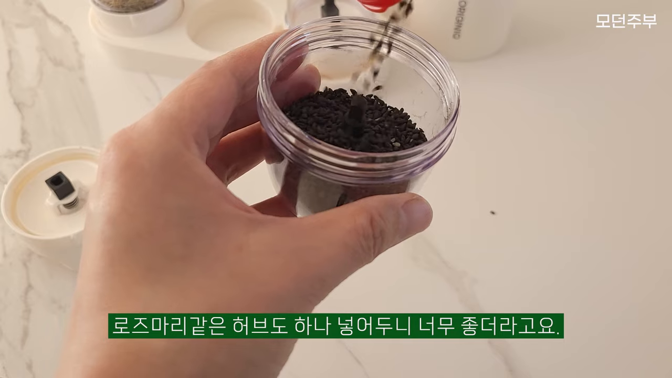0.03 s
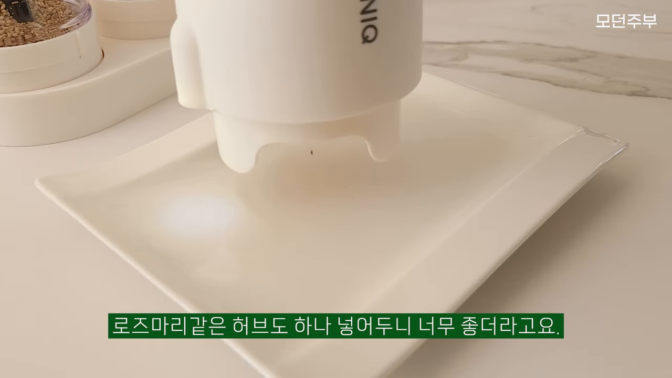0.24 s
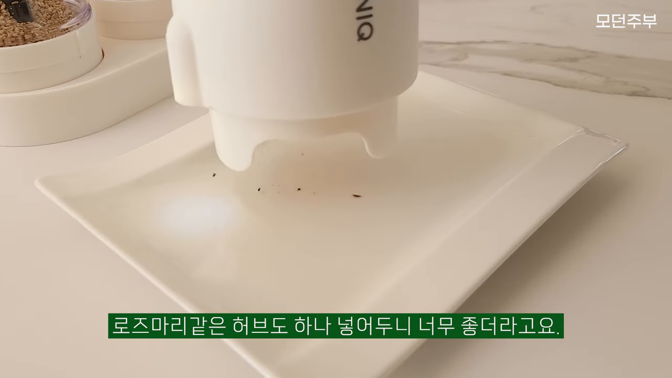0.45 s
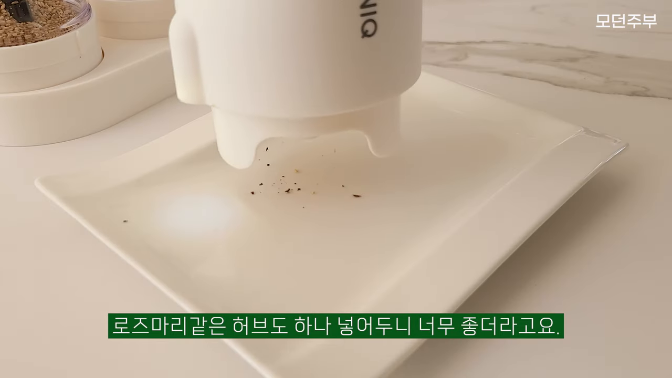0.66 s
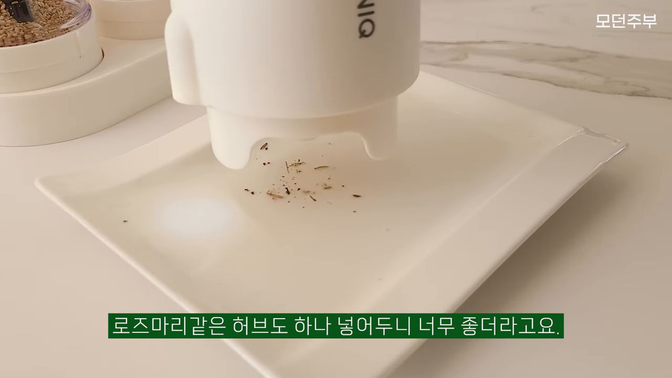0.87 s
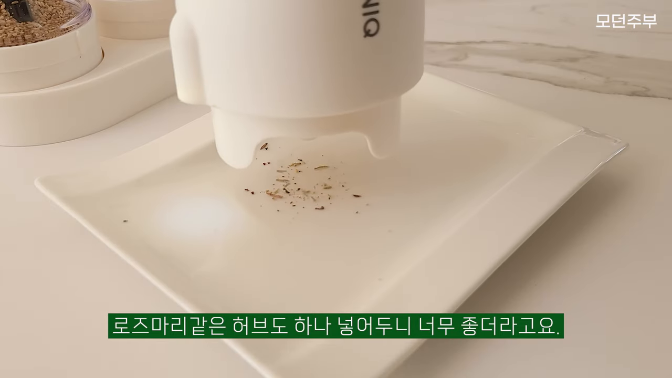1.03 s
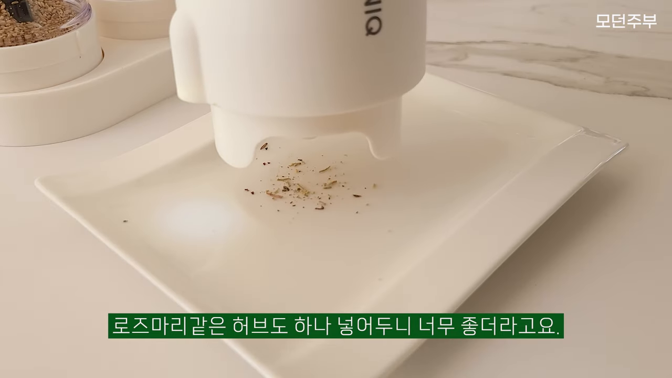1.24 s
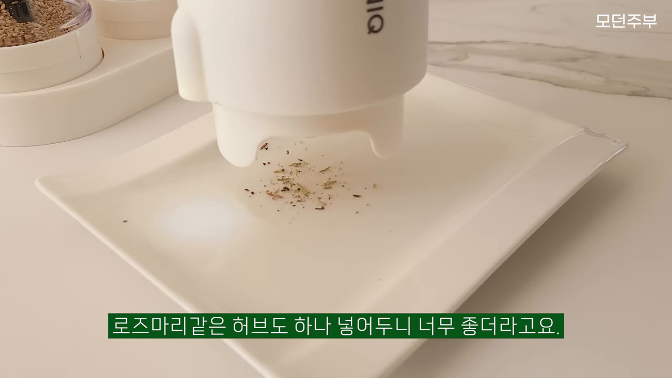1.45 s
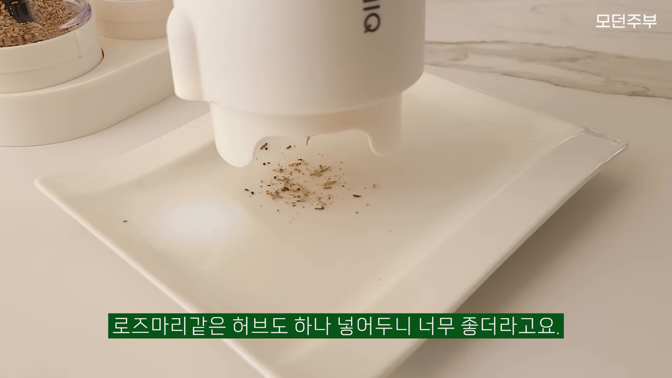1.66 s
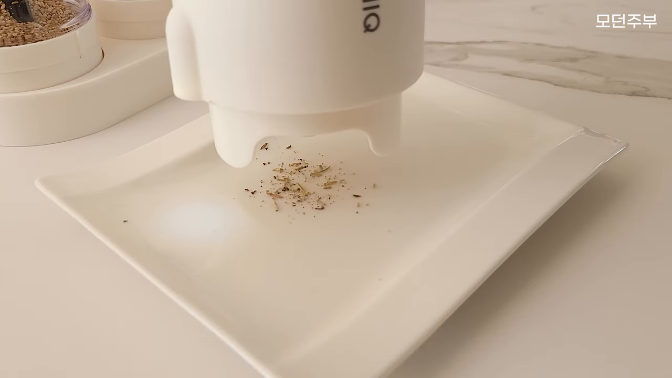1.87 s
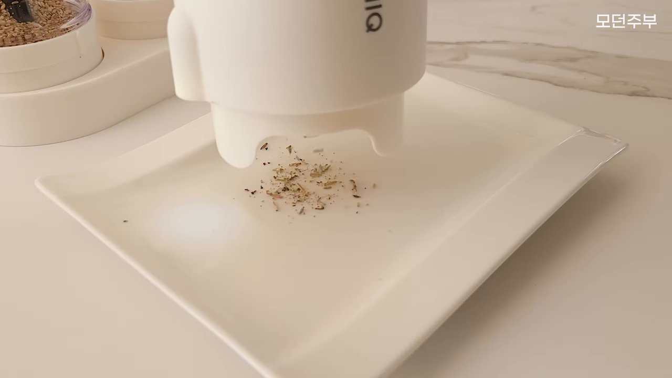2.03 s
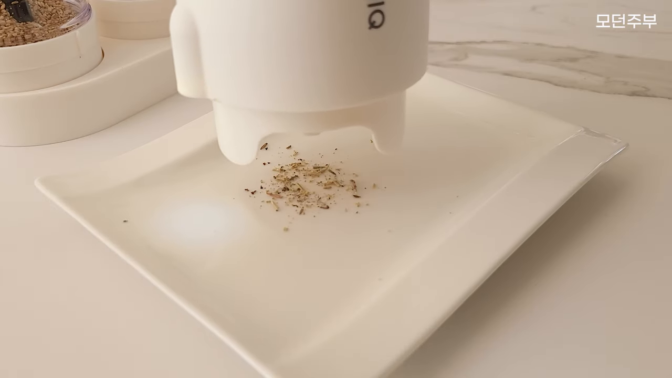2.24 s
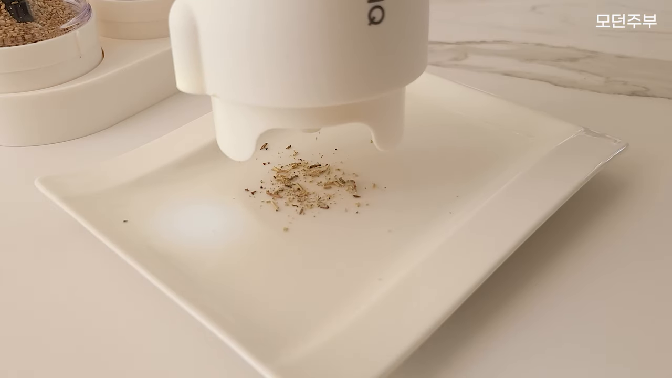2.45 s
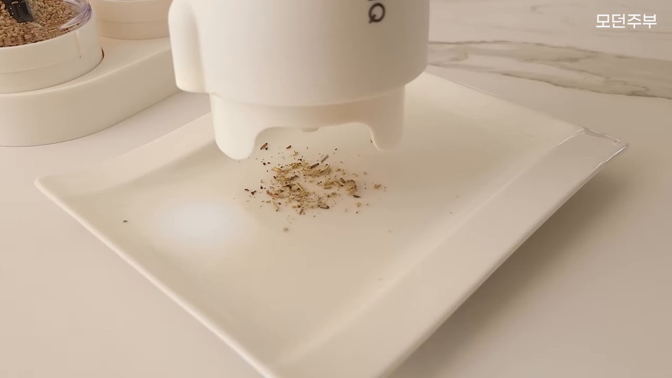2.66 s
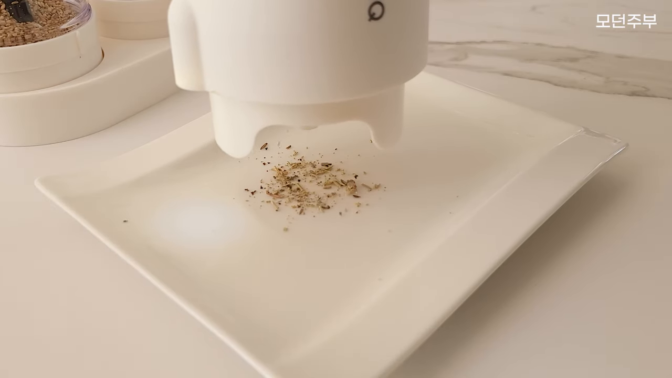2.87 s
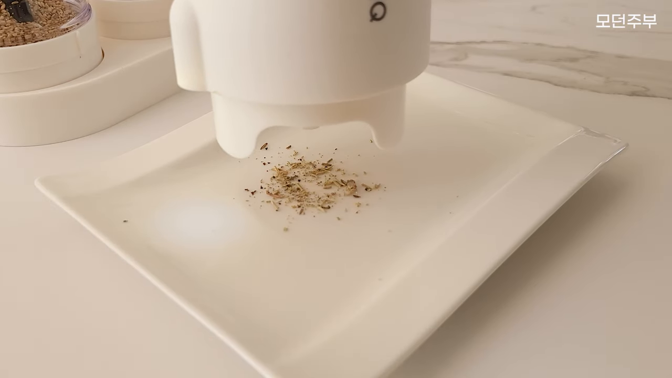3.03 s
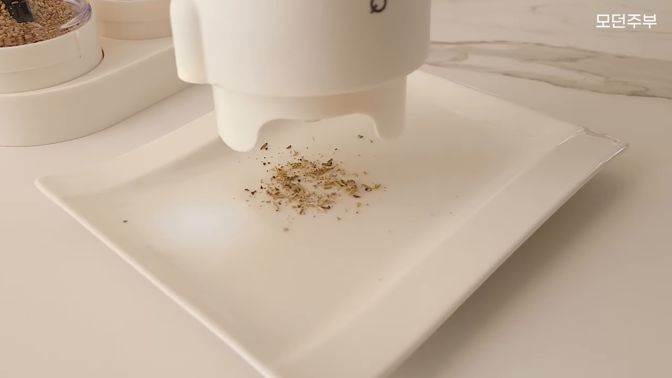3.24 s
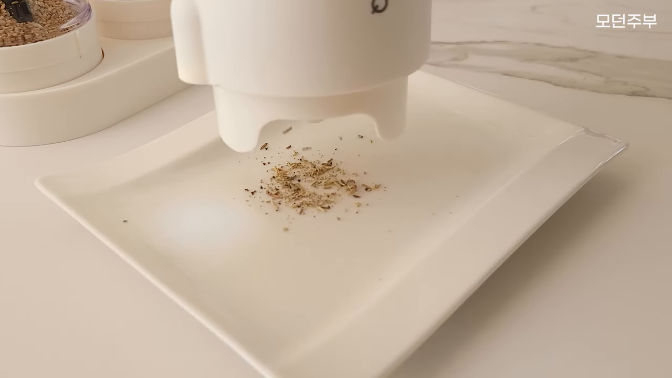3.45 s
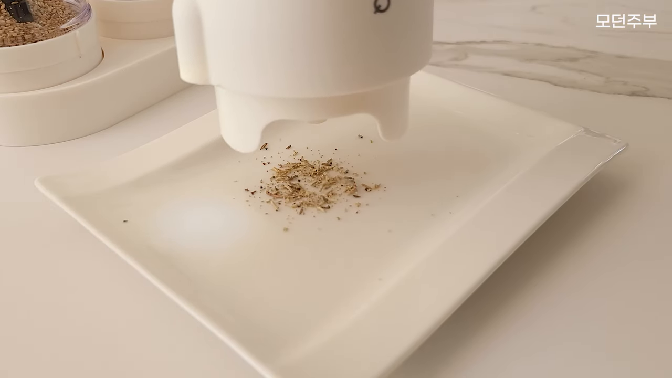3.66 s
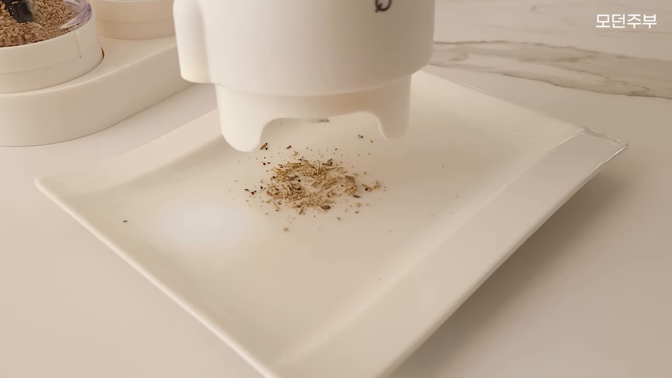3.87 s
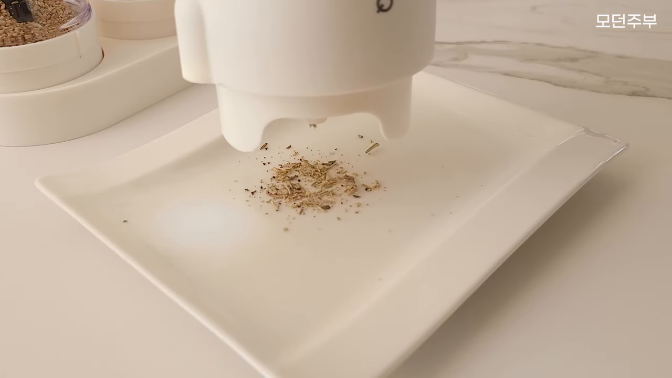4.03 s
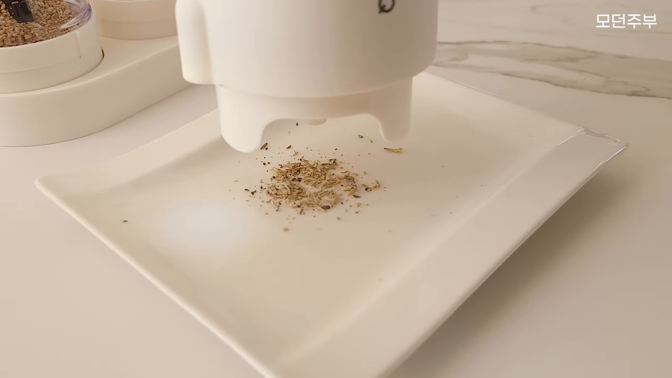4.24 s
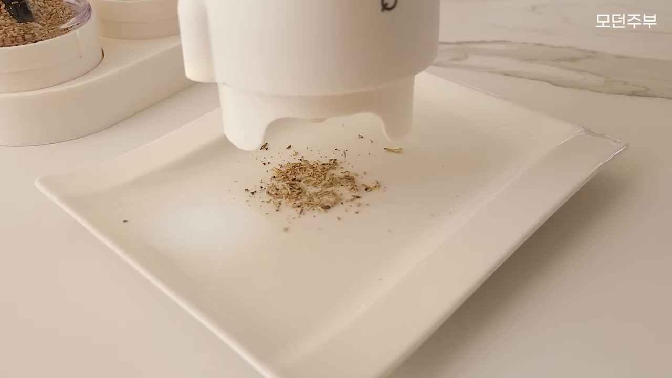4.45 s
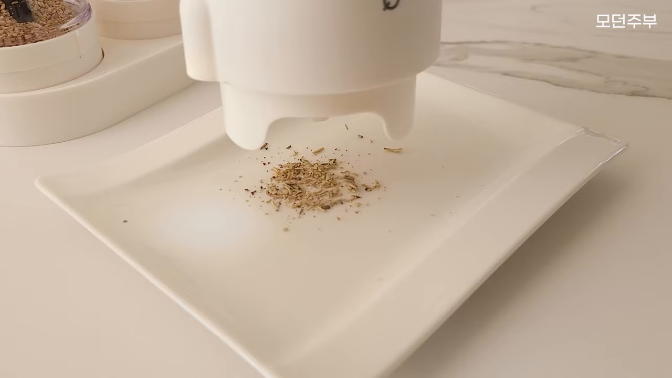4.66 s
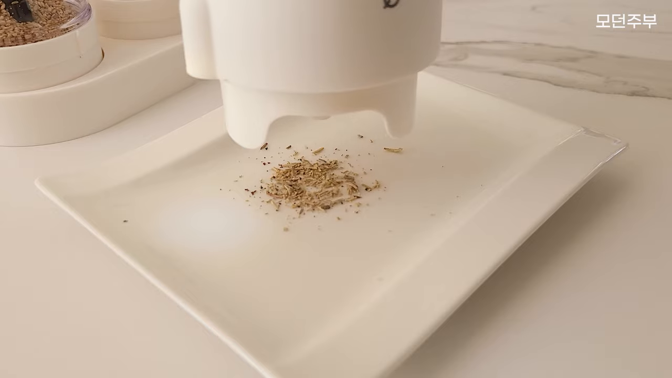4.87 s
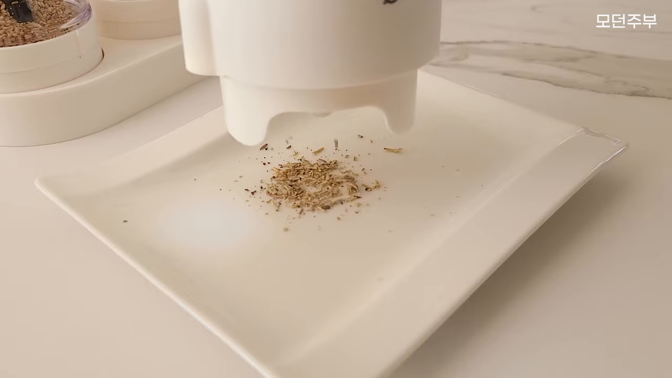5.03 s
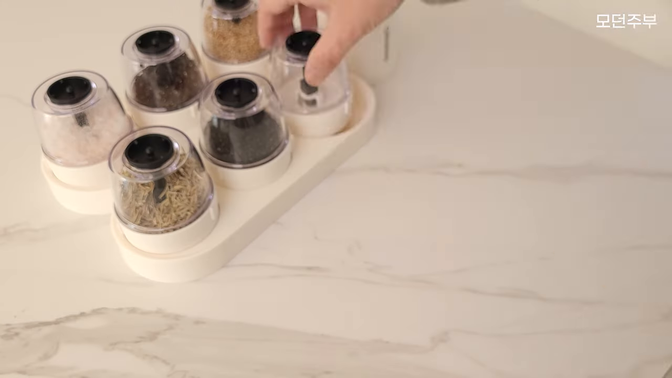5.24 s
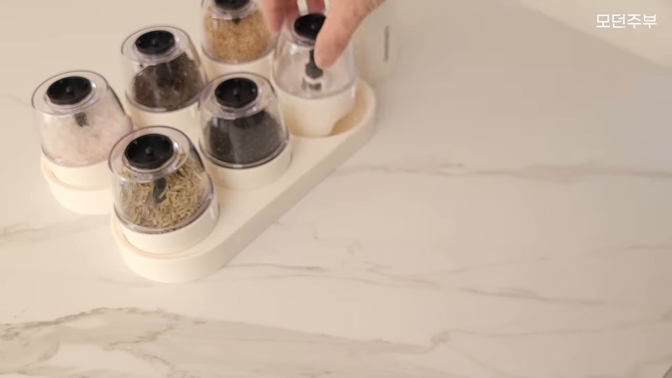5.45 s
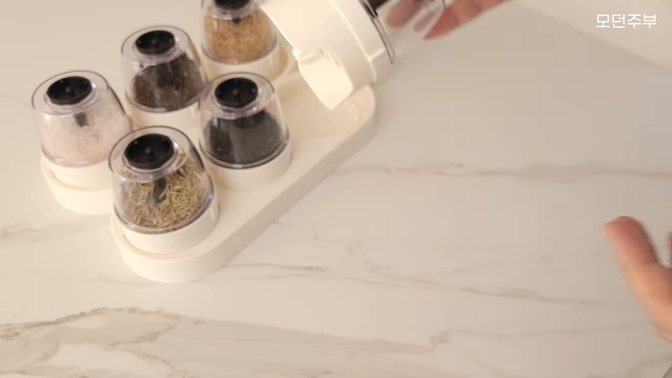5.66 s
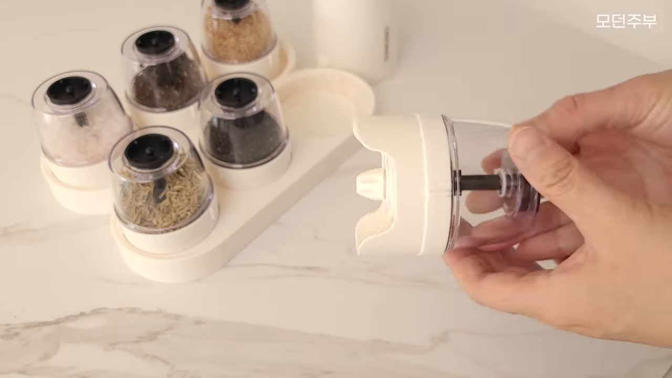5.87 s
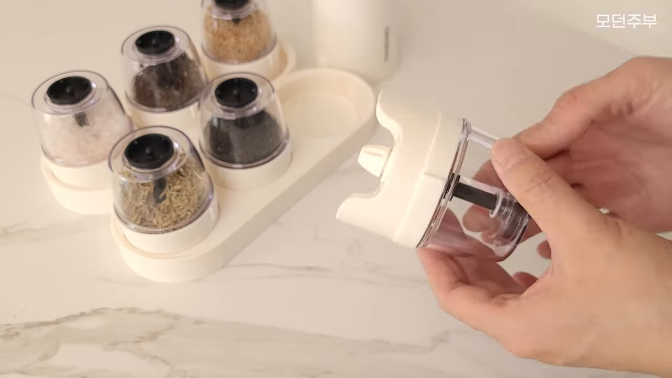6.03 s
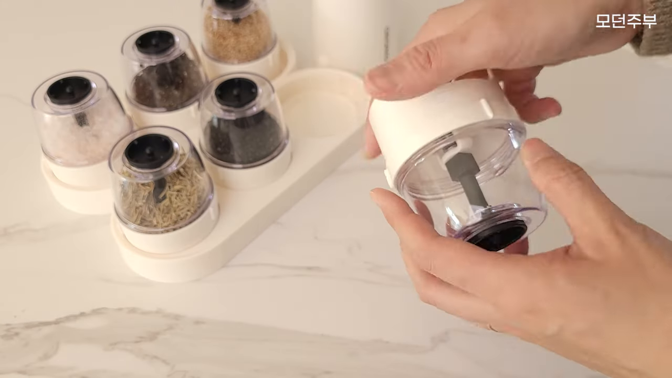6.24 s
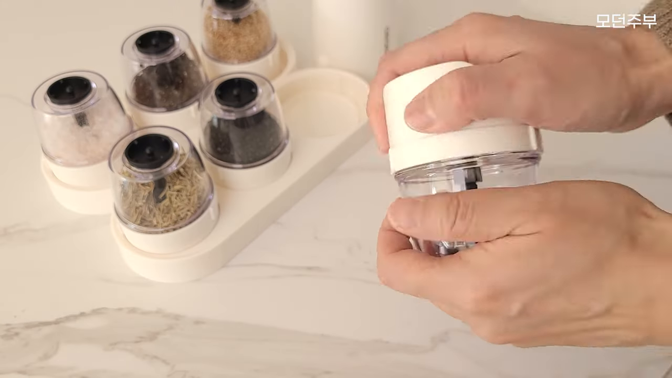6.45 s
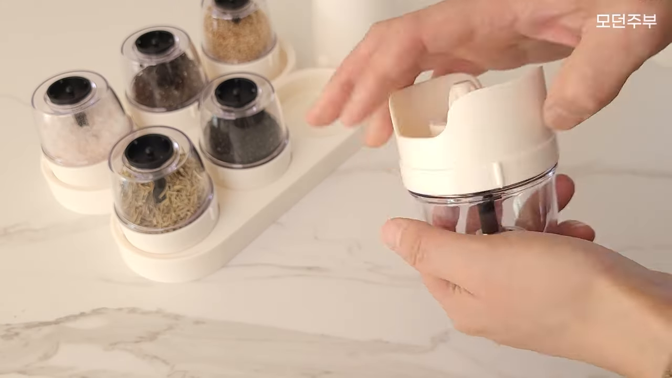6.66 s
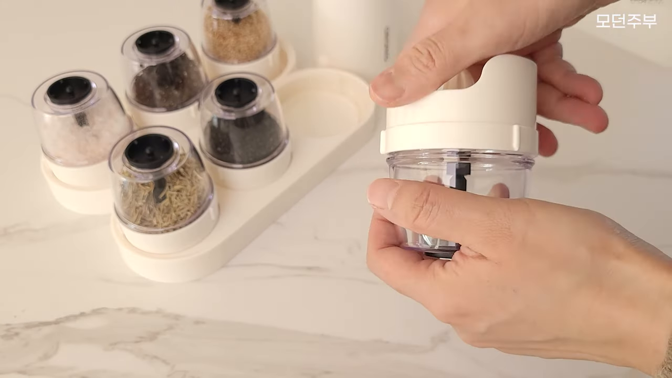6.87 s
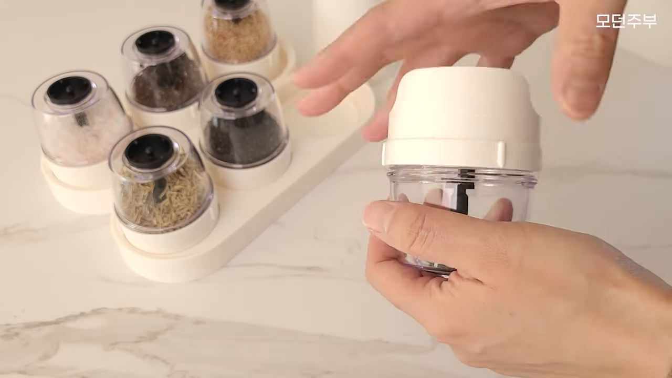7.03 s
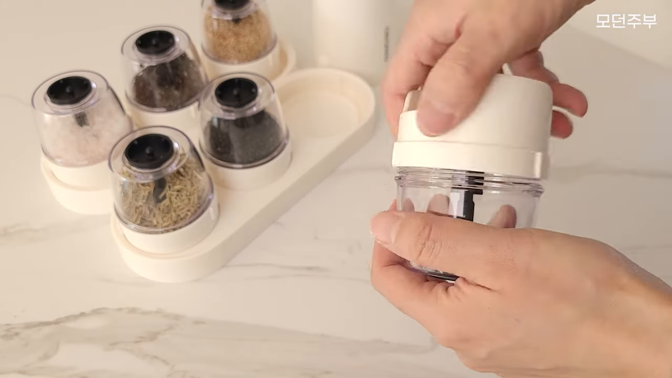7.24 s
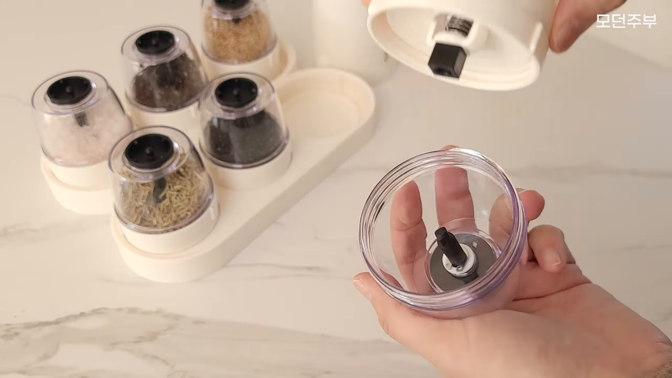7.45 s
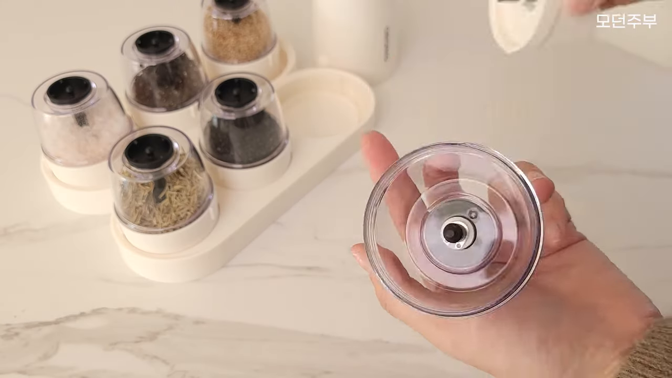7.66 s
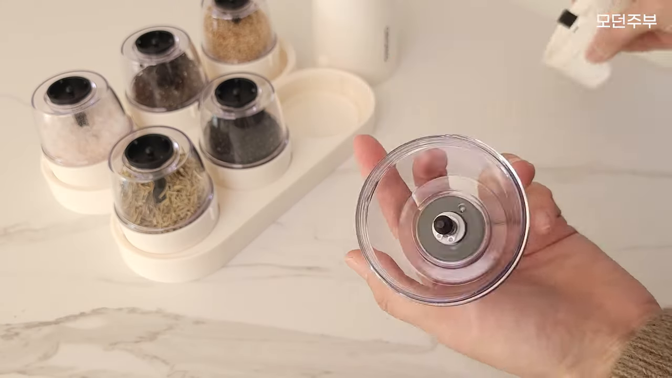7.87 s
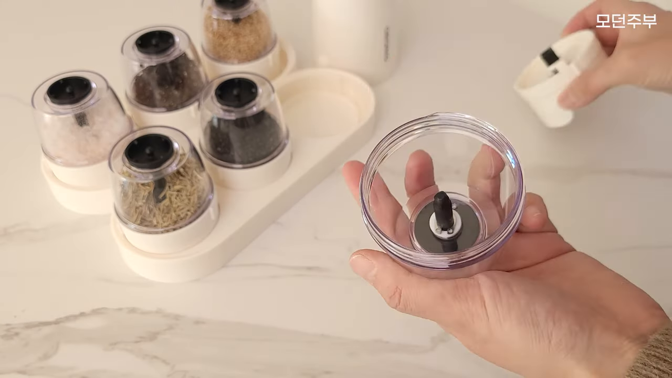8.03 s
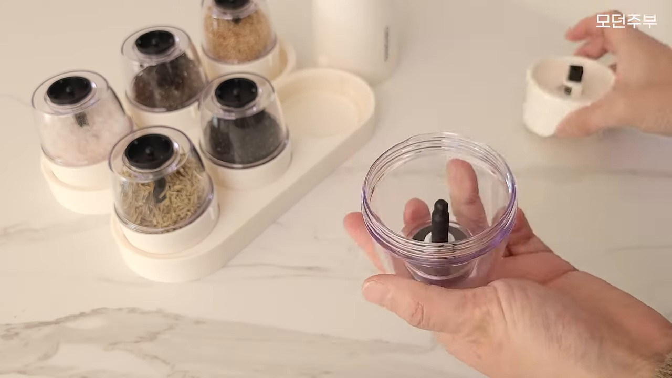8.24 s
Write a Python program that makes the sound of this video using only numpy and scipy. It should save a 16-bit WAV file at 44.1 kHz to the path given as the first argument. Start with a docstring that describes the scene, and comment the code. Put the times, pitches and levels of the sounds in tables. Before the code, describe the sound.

A battery spice grinder whines and crunches dried herbs, stops dead, then hands knock and twist a plastic jar.

```python
"""Peppercorns tick into a jar in a quiet kitchen. At 0.2 s a battery spice grinder starts milling dried herbs
over a plate: a small motor drives a reduction gear whose whine sags whenever the burr bites, while the herbs
crunch and stalks squeal. At 5.3 s the scene changes: close by, hands lift a plastic jar from its tray, turn it
over and twist off the lid, with rubs, knocks and creaks. From 7.1 s a faint high whistle slides downwards."""
import sys
import numpy as np
from scipy import signal
from scipy.fft import rfft, irfft
from scipy.io import wavfile

SR = 44100
rng = np.random.default_rng(int(sys.argv[2]) if len(sys.argv) > 2 else 0)


def digitize_waveform(pressure):
    """Quantize a signal to 16-bit integers and store it at the path in sys.argv[1].

    Rows of a 2-D input are taken as channels; values are limited to [-1, 1].
    """
    field = np.atleast_2d(pressure).T
    bounded = np.clip(field, -1, 1)
    quanta = np.round(bounded * 32767).astype(np.int16)
    wavfile.write(sys.argv[1], SR, quanta)


N = 366030
T, HZ = np.arange(N) / SR, np.fft.rfftfreq(N, 1 / SR)
MOTOR_START_S, MOTOR_STOP_S = 0.2242, 5.3095


def amp(db):
    """Decibels to gain."""
    return 10 ** (np.asarray(db) / 20)


def unit(x):
    """Scales to rms 1."""
    return x / np.sqrt(np.mean(abs(x) ** 2) + 1e-20)


def spectrum(points, hz=HZ):
    """Frequency table, interpolated on a log axis."""
    freq_hz, value = np.transpose(points)
    return np.interp(np.log(hz + 1), np.log(freq_hz + 1), value)


def curve(points):
    """Time table, interpolated at every sample."""
    return np.interp(T, *np.transpose(points))


def gate(start_s, stop_s, edge_s):
    """1 between two times, with linear ramps."""
    return np.clip((T - start_s) / edge_s, 0, 1) * np.clip((stop_s - T) / edge_s + 1, 0, 1)


def arch(start_s, length_s):
    """Smooth swell and fade, peak 1."""
    return np.maximum(np.sin(np.pi * np.clip((T - start_s) / length_s, 0, 1)), 0) ** 1.37


def pan(left_db):
    """Constant-power gains for a left-over-right level."""
    half_db = np.atleast_1d(left_db) / 2
    gains = amp([half_db, -half_db])
    return gains / np.sqrt(np.mean(gains ** 2, 0))


def add(mix, start_s, sound):
    """Mixes a sound in at a time."""
    part = mix[:, round(start_s * SR):][:, :sound.shape[1]]
    part += sound[:, :part.shape[1]]


def flutter(width_hz, size=8192):
    """Complex random modulation, bell spectrum, rms 1."""
    hz = np.fft.fftfreq(size, N / SR / size)
    white = rng.standard_normal(size) + 1j * rng.standard_normal(size)
    slow = np.fft.ifft(white * np.exp(-2 * np.log(2) * (hz / width_hz) ** 2))
    return unit(np.interp(T, np.linspace(0, N / SR, size), slow))


def resonate(x, hz, width_hz):
    """One-pole resonance, rms 1."""
    pole = np.exp((2j * hz - width_hz) * np.pi / SR)
    return unit(signal.lfilter([1], [1, -pole], x).real)


# freq_hz, left_right_coherence
NEAR_COHERENCE = [(60, 1), (150, 0.99), (380, 0.97), (950, 0.58), (2380, 0.66), (5980, 0.9), (15000, 1)]
def noise(colour_db, coherence=NEAR_COHERENCE, lead_rad=0, grain_db=0):
    """Coloured stereo noise, rms 1; grain_db makes it gritty."""
    white = rng.standard_normal((2, N))
    grains = amp(grain_db * np.minimum(rng.exponential(1, N), 6))
    left, independent = rfft(white * grains)
    common = spectrum(coherence)
    right = (common * left + np.sqrt(1 - common ** 2) * independent) * np.exp(-1j * lead_rad)
    return unit(irfft(np.array([left, right]) * amp(colour_db), N))


# time_s, level_db
HUM_LEVEL = [(0.2, -69), (.5, -79), (2.9, -76), (3.4, -66.5), (5.2, -68), (5.45, -60), (6.1, -57),
             (6.5, -68), (8.3, -66.5)]
def room_hum():
    """Wavering 59 Hz hum."""
    tone = unit(1 + flutter(12)) * np.exp(2j * np.pi * 59 * T)
    return amp(curve(HUM_LEVEL)) * np.sqrt(2) * tone.real


# freq_hz, density_db
AIR_BEFORE = [(30, -24), (60, -14), (85, -7), (102, 8), (125, -18), (280, -4), (450, -16), (750, -17),
              (1400, -26), (2700, -41), (4000, -30.5), (5700, -43), (8000, -19.5), (9500, -41),
              (12000, -23), (15500, -23)]
AIR_DURING = [(25, -21.5), (45, -25), (75, 4), (120, 1.5), (260, 2), (400, 1), (700, -27), (2000, -32)]
AIR_AFTER = [(18, -36), (30, -17), (140, -3.5), (307, -2), (359, 1.5), (443, -12), (606, -9), (970, -18.5),
             (1080, -15), (1230, -21.5), (2420, -26.5), (5890, -30.5), (11600, -19.5), (15500, -17.5)]
# time_s, level_db
AIR_DURING_LEVEL = [(0.2, -66), (1, -67.5), (2.9, -69), (3.2, -64), (5.3, -61)]
def room_air():
    """Low room noise and hiss before, during and after the grinding."""
    before = amp(-55.5) * noise(spectrum(AIR_BEFORE)) * gate(-1, MOTOR_START_S, 0.0038)
    during = amp(curve(AIR_DURING_LEVEL)) * noise(spectrum(AIR_DURING))
    during *= gate(MOTOR_START_S, MOTOR_STOP_S, 0.0083)
    after = amp(-57.5) * noise(spectrum(AIR_AFTER)) * gate(MOTOR_STOP_S, T[-1], 0.0035)
    return before + during + after


# freq_hz, t60_s
KITCHEN_DECAY = [(200, 0.21), (1000, 0.42), (4000, 0.23), (8000, .22), (15000, 0.31)]
def kitchen_reverb(x):
    """Dense reflections from hard surfaces, longest near 1 kHz."""
    hz, t, bands = signal.stft(rng.standard_normal((2, SR // 2)), SR, nperseg=256)
    decay = amp(-60 * t / spectrum(KITCHEN_DECAY, hz)[:, None]) * (t > 0.004)
    tail = signal.istft(bands * decay, SR, nperseg=256)[1]
    return signal.fftconvolve(x, tail / np.linalg.norm(tail[0]), axes=1)[:, :N]


# time_s, pitch_hz
WHISTLE_PITCH = [(7.14, 11350), (7.17, 11950), (7.24, 11100), (7.34, 11500), (7.62, 10850), (7.73, 10800),
                 (7.86, 9850)]
# start_s, length_s, level_db
WHISTLE_ARCHES = [(7.13, .09, -61), (7.18, 0.18, -65), (7.5, .42, -71)]
def whistle():
    """Faint, broken treble tone that slides downwards."""
    carrier = np.exp(2j * np.pi * np.cumsum(curve(WHISTLE_PITCH)) / SR)
    tone = np.sqrt(2) * unit((0.15 + flutter(320)) * carrier).real
    return tone * sum(amp(db) * arch(start_s, length_s) for start_s, length_s, db in WHISTLE_ARCHES)


# freq_hz, density_db
TICK_COLOUR = [(3000, -35), (6000, -10), (7800, -1), (9500, -2), (15000, -8)]
def peppercorns(rate_hz=50, level_db=-54, spread_db=1.5, decay_s=0.0027):
    """Hard grains trickle into a jar before the motor starts: short treble ticks."""
    gaps, sizes = rng.random((32, 2)).T
    times_s = np.cumsum(2 * gaps) / rate_hz
    gains = amp(level_db + spread_db * (2 * sizes - 1))
    strikes = sum(gain * (T > start_s) * np.exp(-abs(T - start_s) / decay_s)
                  for start_s, gain in zip(times_s, gains) if start_s < MOTOR_START_S)
    return strikes * noise(spectrum(TICK_COLOUR))


def finger_glide(centre_hz=6800, width_hz=660):
    """Skin hisses on the smooth jar as it is turned over."""
    band_db = -20 * np.log10(1 + (2 * (HZ - centre_hz) / width_hz) ** 2)
    return amp(-71) * arch(start_s=5.33, length_s=1.7) * noise(band_db)


# freq_hz, density_db
RUB_COLOUR = [(60, -15), (100, -5), (150, -1), (210, -7), (300, -6.5), (385, 6.5), (470, -7.5), (600, -5),
              (900, -12.5), (1300, -21.5), (2000, -23), (3000, -42), (8000, -50)]
CLOTH_COLOUR = [(1500, -30), (3000, -14), (5500, -5), (7200, -1.5), (9000, -5), (11500, 1), (14000, -3.5),
                (16000, -9)]
# start_s, length_s, rub_relative_db, cloth_relative_db
STROKES = [(5.339, 0.26, -49.5, -62.5), (5.67, 0.16, -39, -57.5), (5.746, 0.17, -42.5, -55),
           (5.85, 0.25, -50.5, -69), (6.013, 0.23, -49, -61.5), (6.47, 0.31, -60, -66),
           (6.93, .16, -59, -61.5), (7.237, 0.23, -50.5, -58), (7.48, 0.45, -59.5, -91)]
def hand_strokes():
    """Skin rubs low and sleeves hiss with each stroke."""
    rub = amp(-4.5) * noise(spectrum(RUB_COLOUR))
    cloth = amp(2.5) * noise(spectrum(CLOTH_COLOUR), grain_db=3)
    return sum(arch(start_s, length_s) * (amp(rub_db) * rub + amp(cloth_db) * cloth)
               for start_s, length_s, rub_db, cloth_db in STROKES)


# start_s, length_s, pitch_hz, level_db
HAND_BUMPS = [(5.435, 0.034, 296, -50.5), (5.82, 0.071, 147, -41.5), (5.89, 0.024, 350, -44)]
def hand_bumps():
    """The hand bumps the jar: soft, low tone pulses."""
    out = np.zeros((2, N))
    for start_s, length_s, pitch_hz, level_db in HAND_BUMPS:
        t = T[:round(length_s * SR)]
        pulse = np.sin(np.pi * t / length_s) * np.sin(2 * np.pi * pitch_hz * t)
        add(out, start_s, amp(level_db) * np.sqrt(2) * pulse[None])
    return out


# freq_hz, density_db
SCRAPE_COLOUR = [(200, -18), (480, 4), (1000, -21), (1700, -9.5), (2900, -11.5), (3600, -14.5), (4250, -13),
                 (5200, -16), (8000, -16), (15000, -22)]
# start_s, length_s, level_db, creak_hz, creak_gain
PLASTIC_SLIDES = [(5.428, 0.058, -52.5, 2000, .3), (6.312, .015, -62, 2050, 0.52),
                  (6.352, .025, -68.5, 1980, 1.3), (6.461, .022, -51, 1750, .4),
                  (6.54, 0.15, -58, 2770, .2), (6.625, 0.015, -60, 2220, 0.74),
                  (6.924, 0.033, -59, 2180, 1), (6.964, .015, -54, 2400, .4),
                  (6.991, 0.04, -54, 2080, 0.76), (7.268, 0.12, -57, 1450, 0.36)]
def plastic_slides(attack_s=0.016, release_s=0.015):
    """Plastic slips on plastic, as in the screw thread: a scrape with a resonant creak."""
    out, t = np.zeros((2, N)), T[:SR // 3]
    friction = noise(spectrum(SCRAPE_COLOUR), grain_db=4)
    for start_s, length_s, level_db, creak_hz, creak_gain in PLASTIC_SLIDES:
        scrape = friction[:, round(start_s * SR):][:, :len(t)]
        creak = resonate(scrape, creak_hz, width_hz=170)
        pressure = np.minimum(t / attack_s, 1) * np.exp(-np.maximum(t - length_s, 0) / release_s)
        add(out, start_s, amp(level_db) * pressure * (0.9 * scrape + creak_gain * creak))
    return out


def plastic_response(modes, hz):
    """Resonances of a plastic part over a flat direct share, peak 1."""
    response = 0.24 + sum(amp(db) / (1 + 1j * (hz ** 2 - mode_hz ** 2) / (width_hz * hz + 1e-9))
                          for mode_hz, width_hz, db in modes)
    return response / abs(response).max()


# mode_hz, width_hz, relative_db
JAR_MODES = [(515, 124, 8.5), (1790, 110, 5), (1980, 93, 8.5), (4070, 260, 10), (5290, 150, -16),
             (6700, 310, 1), (8350, 420, -1), (10950, 400, -9)]
LID_MODES = [(402, 180, -10), (600, 91, 1), (1054, 105, -1), (1226, 210, 0), (1580, 300, 2.5),
             (2070, 160, -4), (2540, 260, -1.5), (2960, 450, -1.5), (4600, 520, -1), (5100, 200, -13),
             (6400, 540, -5.5), (8300, 570, -3)]
# start_s, relative_db, decay_s, centre_hz, spread_octaves, lid_share
KNOCKS = [(0.152, -39.5, 0.0018, 8040, .35, 0.1), (5.3598, -33, 0.0031, 900, 1, .5),
          (5.3635, -35.5, 0.0049, 1830, 1.4, 0.5), (5.3773, -31, 0.0057, 900, 0.98, 0.74),
          (5.4649, -35.5, 0.011, 1220, 0.89, 0.6), (5.4677, -27.5, 0.0023, 1800, 2.1, 0.36),
          (5.826, -40, .005, 5000, 1.1, 0.1), (6.4524, -26.5, 0.0027, 4470, 0.86, 0.15),
          (6.4533, -35.5, .004, 600, 0.81, .6), (6.4586, -29, 0.0021, 1300, 1.2, 0.2),
          (6.6405, -34.5, 0.0052, 514, 0.57, 0.1), (6.6405, -37, 0.0032, 2100, 0.28, 0.1),
          (7.2734, -22, 0.0015, 1280, 0.93, 0.4), (7.3709, -30, 0.01, 900, 1.8, .8),
          (7.3775, -15, 0.0028, 1700, 1.95, 1), (7.388, -27, 0.0065, 1120, 0.25, 1),
          (7.51, -42.5, 0.0027, 6270, 0.2, .5), (8.198, -49, .004, 5700, 0.12, 0.7),
          (8.272, -46, 0.003, 1270, 0.3, 0.8), (8.272, -54, .003, 6000, .15, .7)]
def plastic_knocks(attack_s=0.00027):
    """Each contact is a burst of chatter that rings the jar and the lid."""
    out, t = np.zeros((2, N)), T[:SR // 4]
    hz = np.fft.rfftfreq(len(t), 1 / SR)
    jar, lid = plastic_response(JAR_MODES, hz), plastic_response(LID_MODES, hz)
    for start_s, relative_db, decay_s, centre_hz, spread_octaves, lid_share in KNOCKS:
        chatter = rng.standard_normal(len(t)) + rng.standard_normal((2, len(t)))
        band = 1 / np.sqrt(1 + (np.log2((hz + 1) / centre_hz) / spread_octaves) ** 4)
        envelope = np.exp(-t / decay_s) * (1 - np.exp(-t / attack_s))
        burst = irfft(rfft(chatter) * band, len(t)) * envelope
        ring = irfft(rfft(burst) * (lid_share * lid + (1 - lid_share) * jar), len(t))
        length_gain = np.sqrt(decay_s / t[-1] / 2)  # longer contacts carry more energy
        add(out, start_s, amp(relative_db - 5.5) * length_gain * unit(ring))
    return out


def stalks(count=45, length_s=0.09, low_hz=6000, high_hz=12500):
    """Dry stalks catch in the burr and squeal briefly."""
    out, t = np.zeros((2, N)), T[:round(length_s * SR)]
    swell = amp(-45) * np.sin(np.pi * t / length_s)
    for when, pitch, size, side in rng.random((count, 4)):
        start_s = MOTOR_START_S + when * (MOTOR_STOP_S - MOTOR_START_S - length_s)
        pitch_hz = low_hz + pitch * (high_hz - low_hz)
        squeal = resonate(rng.standard_normal((2, len(t))), pitch_hz, width_hz=280)
        add(out, start_s, (0.5 + size) * pan(12 * side - 6) * swell * squeal)
    return out


ROTOR_RATIO, IDLER_RATIO = 2.25, 0.85  # turns per gear turn
FEED_WANDER_HZ = 5.7
def wander(rms_db):
    """Gain that drifts at random with the feed of herbs."""
    return amp(rms_db * np.sqrt(2) * flutter(FEED_WANDER_HZ).real)


# rotor_order, relative_db
MOTOR_TONES = [(1, -67), (3, -62), (4, -57), (5, -74), (6, -65.5), (9, -59), (10, -61.5), (12, -88),
               (18, -68)]
def motor(gear_rad):
    """Rotor harmonics that come and go with the brushes and the feed."""
    out = np.zeros(N)
    for order, relative_db in MOTOR_TONES:
        gain = amp(relative_db - 0.7) * wander(rms_db=2.5)
        out += gain * np.sqrt(2) * np.cos(order * ROTOR_RATIO * gear_rad + 2 * np.pi * rng.random())
    return out


# freq_hz, left_lead_rad
GRINDER_LEAD = [(200, 1), (800, 0.3), (1300, 1.13), (2700, 1), (3150, 2), (3600, 2), (4100, -3),
                (5050, -.5), (5650, 0.5), (6700, -2.5), (8200, -1.5), (15000, -2)]
def place_tone(tone, hz, left_db):
    """Complex tone to stereo, offset in level and phase."""
    right = tone * np.exp(-1j * spectrum(GRINDER_LEAD, hz))
    return pan(left_db) * np.sqrt(2) * np.array([tone.real, right.real])


# gear_order, width_hz, relative_db, left_db
RATTLE_BANDS = [(9.09, 52, -59, -9), (13.68, 46, -54, 0), (15.44, 187, -46, 6), (30.12, 170, -41.5, -3.5),
                (61.3, 270, -45.5, -2.5)]
def backlash(gear_rad, gear_hz):
    """Loose teeth rattle in narrow bands, heard direct and scattered off the plate."""
    out = np.zeros((2, N))
    for order, width_hz, relative_db, left_db in RATTLE_BANDS:
        carrier = np.exp(1j * order * gear_rad)
        direct = place_tone(flutter(width_hz) * carrier, order * gear_hz, left_db)
        scattered = np.array([(flutter(width_hz) * carrier).real for side in range(2)])
        out += amp(relative_db) * unit(direct + 0.78 * scattered)
    return out


# freq_hz, density_db
CRUNCH_COLOUR = [(40, -30.5), (150, -20), (300, -14.5), (480, -17), (700, -7), (1050, -5.5), (1600, -3),
                 (2200, -6), (3000, 0.5), (3550, -4.5), (6000, -0.5), (9000, 0), (12000, -2),
                 (16000, -18.5)]
# centre_hz, width_hz, gain_db
HOUSING_PEAKS_AND_DIPS = [(838, 130, 8), (1910, 430, 3.5), (2350, 270, -2), (3070, 68, 5.5), (3340, 250, 0),
                          (4160, 640, 2), (4570, 200, 5.5), (4730, 260, -4.5), (5360, 200, 9),
                          (6800, 270, 7.5), (7130, 66, 6), (7840, 220, -3.5), (8170, 930, 5),
                          (9900, 480, -4), (10700, 450, 5), (11700, 700, 2), (12900, 640, 1.5),
                          (13800, 300, 3), (14800, 800, 12)]
# freq_hz, left_db
CRUNCH_PAN = [(300, 3), (900, 1.5), (1800, 3.5), (2200, -6.5), (3000, 5.5), (4000, -2), (4500, 6.5),
              (6000, 0), (6700, 2.5), (8500, -3.5), (10000, 13), (10800, 8), (12000, -0.5), (15000, 0)]
# freq_hz, left_right_coherence
CRUNCH_COHERENCE = [(100, 1), (900, 0.82), (1500, 0.55), (2100, 0.57), (2700, .8), (3800, 0.13), (4900, .2),
                    (5300, 0.16), (5800, 0.092), (8500, 0.58), (15000, .25)]
def crunch(gear_rad):
    """Crushed herbs sound through the housing, throbbing with each wheel and the uneven feed."""
    colour_db = spectrum(CRUNCH_COLOUR)
    for centre_hz, width_hz, gain_db in HOUSING_PEAKS_AND_DIPS:
        colour_db += gain_db * np.exp(-4 * np.log(2) * ((HZ - centre_hz) / width_hz) ** 2)
    grit = noise(colour_db, CRUNCH_COHERENCE, spectrum(GRINDER_LEAD), grain_db=2)
    grit = unit(irfft(rfft(grit) * pan(spectrum(CRUNCH_PAN)), N))
    wheels = 0.088 * np.cos(IDLER_RATIO * gear_rad) + 0.033 * np.cos(gear_rad)
    wheels += 0.054 * np.cos(ROTOR_RATIO * gear_rad)
    feed = 0.1 * flutter(110).real + 0.062 * flutter(25).real
    return (1 + wheels + feed) * grit


def tooth_tones(rows, gear_rad, gear_hz):
    """Teeth mesh at whole gear orders; uneven contact makes higher tones waver faster."""
    out = np.zeros((2, N))
    for order, relative_db, left_db, roughness in rows:
        order = round(order)
        contact = np.sqrt(1 - roughness ** 2) + roughness * flutter(width_hz=order)
        tone = contact * np.exp(1j * order * gear_rad)
        out += amp(relative_db) * place_tone(tone, order * gear_hz, left_db)
    return out


# gear_order, relative_db, left_db, roughness
WHINE_TONES = [(30, -9, 18, 0.58), (31, 0, 4.5, 0.12), (46, -13.5, -1.5, 0.7), (61, -13, 1, 0.68),
               (62, -32, -2, 0.6), (75.5, -12, -11, 0.42), (75.05, -12, -5.5, 0), (92.5, -15, -5, 1)]
LOW_GEAR_TONES = [(15, -1.5, -0.5, 0.51), (16, -6.5, -0.5, 1)]
def gears(gear_rad, gear_hz, load, whine_gain, low_gain):
    """Gear tones pulse once a gear turn under load, and as the pinion pushes each rotor turn."""
    whine = whine_gain * tooth_tones(WHINE_TONES, gear_rad, gear_hz)
    low = low_gain * tooth_tones(LOW_GEAR_TONES, gear_rad, gear_hz)
    wobble = 1 + 0.17 * load * abs(flutter(FEED_WANDER_HZ)) * np.cos(gear_rad)
    pinion = 1 + 0.051 * np.cos(ROTOR_RATIO * gear_rad)
    return (whine + low) * wobble * pinion


# time_s, pitch_hz
WHINE_PITCH = [(0.23, 2732), (0.37, 2552), (0.49, 2671), (0.73, 2603), (0.81, 2670), (1.09, 2707),
               (1.23, 2658), (1.54, 2768), (1.69, 2658), (1.81, 2724), (1.93, 2668), (2.17, 2716),
               (2.24, 2691), (2.37, 2759), (2.58, 2743), (2.74, 2777), (2.85, 2772), (3.0, 2625),
               (3.35, 2720), (3.54, 2643), (3.68, 2727), (3.77, 2659), (4.28, 2756), (4.45, 2677),
               (4.59, 2718), (4.66, 2675), (4.75, 2739), (5.1, 2647), (5.21, 2726), (5.3, 2687)]
def grinder(whine_order=31, free_hz=2780, laden_hz=2650, first_bite_db=2.5, clearing_s=0.16):
    """One shaft speed drives all parts; when the burr bites, pitch sags and level rises."""
    whine_hz = curve(WHINE_PITCH)
    gear_hz = whine_hz / whine_order
    jitter = 1 + 0.002013 * flutter(40.3).real
    gear_rad = 2 * np.pi * np.cumsum(gear_hz * jitter) / SR
    load = np.clip((free_hz - whine_hz) / (free_hz - laden_hz), 0, 1.3)
    running_s = T - MOTOR_START_S
    emptying_db = -0.7 * running_s  # low tones ease as the jar empties
    full_burr_db = first_bite_db * np.exp(-abs(running_s) / clearing_s)
    whine_gain = amp(-39 + 4.75 * load) * wander(rms_db=0.71)
    low_gain = amp(-43 + 4.5 * load + emptying_db) * wander(rms_db=1.7)
    crunch_gain = amp(-33.6 + 0.73 * load + full_burr_db) * wander(rms_db=0.57)
    out = gears(gear_rad, gear_hz.mean(), load, whine_gain, low_gain)
    out += unit(np.sqrt(whine_gain)) * backlash(gear_rad, gear_hz.mean())
    out += motor(gear_rad) + crunch_gain * crunch(gear_rad)
    return out * gate(MOTOR_START_S, MOTOR_STOP_S, edge_s=0.0017)


def scene():
    """Peppercorns, grinder, then the jar, over the room."""
    knocks = plastic_knocks()
    out = peppercorns() + grinder()
    out += knocks + amp(-8.5) * kitchen_reverb(knocks)
    out += hand_strokes() + plastic_slides() + hand_bumps() + whistle()
    return out + room_hum() + room_air() + stalks() + finger_glide()


def record(dry):
    """Steep low-pass at 15.85 kHz."""
    lowpass = signal.firwin(511, 15850, window=("kaiser", 9), fs=SR)
    return signal.oaconvolve(dry, lowpass[None], "same")


dry = scene()
out = record(dry)
digitize_waveform(out)
```